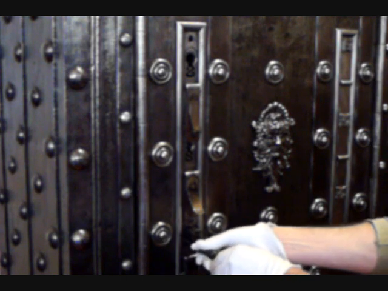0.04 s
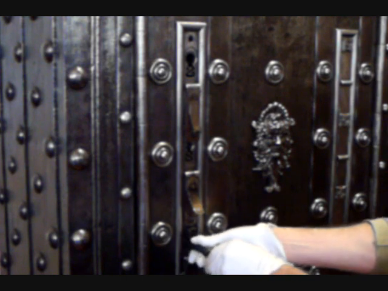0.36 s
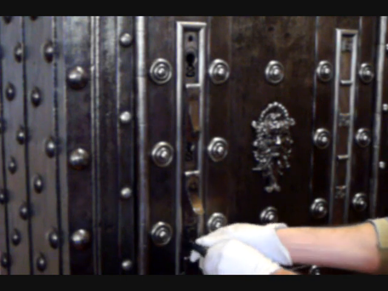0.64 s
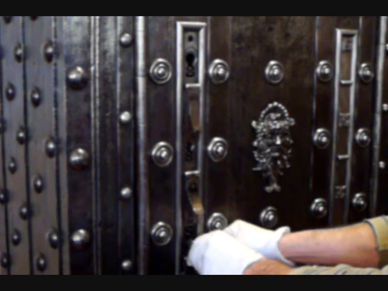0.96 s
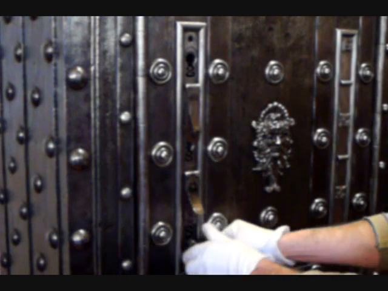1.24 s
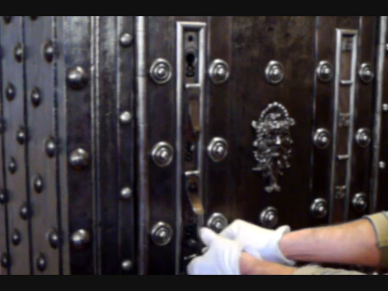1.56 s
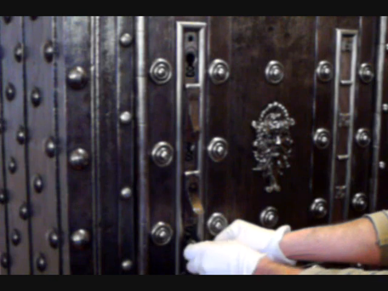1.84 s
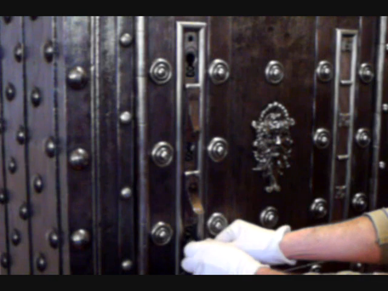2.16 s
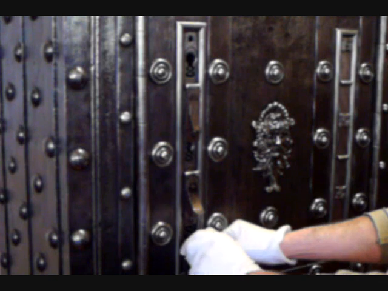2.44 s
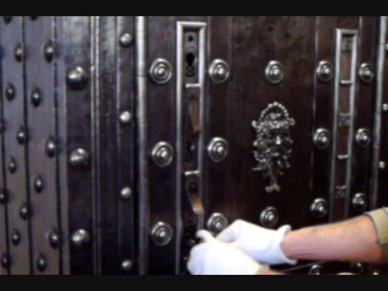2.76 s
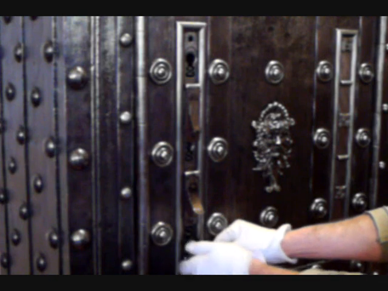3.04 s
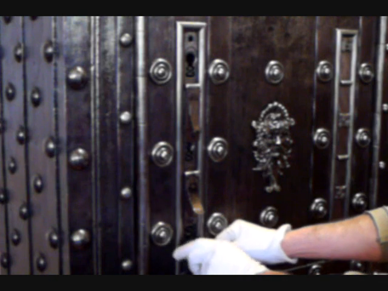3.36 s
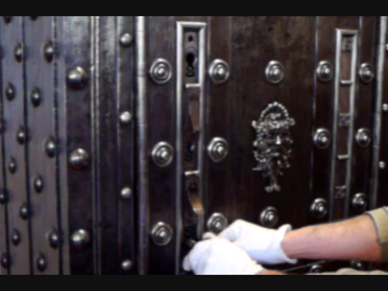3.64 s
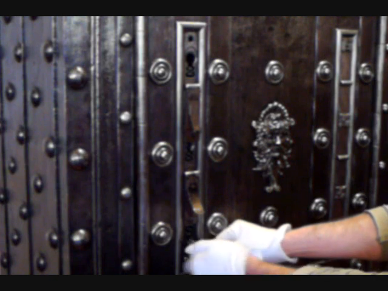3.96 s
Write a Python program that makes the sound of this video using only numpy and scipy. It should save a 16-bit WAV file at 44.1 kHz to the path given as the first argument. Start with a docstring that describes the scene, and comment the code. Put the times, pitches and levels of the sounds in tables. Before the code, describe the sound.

A key rattles in an old iron safe's lock, with a light knock at the start and short bursts of metallic knocks around 0.8, 1.8 and 2.4 seconds. The key gives two tiny high squeaks at about 3.2 and 3.4 seconds. Rattling builds from 3.6 seconds to a loud, slightly overloaded bolt clack near 3.9 seconds. Everything sounds dull, over steady hiss and low rumble in a quiet room.

```python
"""In a quiet, hissy room, gloved hands work a key in the lock of an old iron-clad safe.
Key and levers knock and rattle in short bursts; each touch rings the door, the lock case, its cover
plate and the small steel parts. The key squeaks on dry steel, faintly at 1.4 s and twice after 3 s.
Near 3.9 s the bolt shoots with a loud clack that overloads the dull-sounding recorder."""
import sys
import numpy as np
from scipy.fft import rfft, irfft, next_fast_len
from scipy.io import wavfile

SR = 44100
rng = np.random.default_rng(int(sys.argv[2]) if len(sys.argv) > 2 else 0)


def unload_wav(signal):
    """Save mono or channel-first audio to the path in sys.argv[1] as 16-bit WAV at rate SR, clipped to [-1, 1]."""
    wavfile.write(
        sys.argv[1],
        SR,
        np.round(np.clip(np.atleast_2d(signal).T, -1, 1) * 32767).astype(np.int16),
    )


N = 176400
T = np.arange(SR) / SR  # one second of time, the length of each single sound
HZ = np.fft.rfftfreq(SR, 1 / SR)
LOUDNESS_S = 0.021  # a contact's level is its energy spread over this time


def amp(db):
    """Turn decibels into a gain."""
    return 10 ** (np.asarray(db) / 20)


def unit(x):
    """Scale a signal to an average (rms) level of 1."""
    return x / np.sqrt(np.mean(x ** 2) + 1e-20)


def along(points, hz):
    """Read a curve of (frequency, value) points on a log frequency axis."""
    freqs, values = np.transpose(points)
    return np.interp(np.log(hz + 1), np.log(freqs + 1), values)


def filtered(x, response):
    """Give each frequency in x the gain that response(hz) sets."""
    size = next_fast_len(len(x) + 8192)
    return irfft(rfft(x, size) * response(np.fft.rfftfreq(size, 1 / SR)), size)[:len(x)]


def noise(spectrum, size):
    """Noise of level 1, shaped by a spectrum."""
    return unit(filtered(rng.standard_normal(size), lambda hz: amp(along(spectrum, hz))))


def add(track, start, sound):
    """Mix a sound into the track at a start time in seconds."""
    i = max(0, round(start * SR))
    track[i:i + len(sound)] += sound[:len(track) - i]


def room_tone(level_db=-41):
    """Steady low rumble and microphone hiss."""
    # spectrum of rumble and hiss: f/Hz, level/dB
    spectrum = [(12, -40), (20, -3), (26, -5.5), (64, -2.5), (135, -6), (215, -7), (284, -9), (557, -13),
                (656, -15), (930, -17), (1740, -19.5), (1870, -20), (5200, -21.5), (6760, -44),
                (11400, -120)]
    return amp(level_db) * noise(spectrum, N)


def door_sway(rise_s=.012, t60_s=.25):
    """The pushed door rocks on its hinges with a deep, soft rumble; t60 is the time to fade by 60 dB."""
    # pushes on the door: t/s, level/dB
    pushes = [(0.935, -28.5), (3.868, -25.5)]
    # spectrum of the rumble: f/Hz, level/dB
    spectrum = [(10, -32), (25, -14), (62, -9), (100, -16), (200, -34.5), (500, -79)]
    out = np.zeros(N)
    envelope = (1 - np.exp(-T / rise_s)) * amp(-60 * T / t60_s)
    for start, db in pushes:
        add(out, start, amp(db) * unit(envelope * noise(spectrum, SR)) * np.sqrt(2 * LOUDNESS_S))
    return out


def key_squeaks(pitch_hz=5210, width_hz=21, rise_s=0.002, t60_s=0.082, ring_t60_s=.45):
    """The key slips on dry steel: one high, slightly unsteady tone over a scrape; then it rings faintly."""
    # slips of the key: t/s, length/s, tone/dB, scrape/dB, ring/dB
    slips = [(1.384, 0.0087, -38, -48, -52), (3.180, 0.0083, -28, -42.5, -53),
             (3.401, 0.024, -36.5, -38, -35.5)]
    # spectrum of the scrape: f/Hz, level/dB
    spectrum = [(500, -44), (2300, -20), (2760, -4), (3050, -5), (3350, 7.5), (4300, 3), (5200, 11),
                (6000, -39)]
    # the key's own ringing tones: f/Hz, level/dB
    key_tones = [(2760, -9), (3340, -15), (3850, -11), (5230, -2.5)]
    out = np.zeros(N)
    onset = np.minimum(T / rise_s, 1)
    for start, length, tone_db, scrape_db, ring_db in slips:
        envelope = amp(-60 * np.maximum(T - length, 0) / t60_s)
        drift = np.cumsum(rng.standard_normal(SR)) * np.sqrt(2 * np.pi * width_hz / SR)
        tone = amp(tone_db) * np.sqrt(2) * np.sin(2 * np.pi * pitch_hz * T + drift)
        ringing = sum(amp(db) * np.sin(2 * np.pi * (hz * T + rng.random())) for hz, db in key_tones)
        ringing *= amp(ring_db - 60 * T / ring_t60_s)
        scrape = amp(scrape_db) * noise(spectrum, SR)
        add(out, start, onset * (ringing + envelope * (tone + scrape)))
    return out


def levers(pitch_spread=.06):
    """A lever snaps home with a short ping of five close tones."""
    # lever snaps: t/s, f/Hz, level/dB, t60/s
    snaps = [(0.055, 1104, -28, 0.078), (0.786, 1131, -12.5, 0.042), (0.908, 4950, -32, 0.033),
             (1.384, 4720, -35.5, 0.065), (1.385, 906, -38, .09), (1.7175, 4250, -31, .08),
             (1.7197, 2450, -39.5, 0.21), (1.720, 924, -21.5, 0.057), (1.722, 1820, -31, 0.1),
             (2.383, 4460, -33, .03), (2.437, 926, -16.5, 0.068), (3.743, 4950, -16.5, 0.016),
             (3.859, 2625, 0.5, 0.017)]
    out = np.zeros(N)
    for start, hz, db, t60 in snaps:
        offsets = np.linspace(-1, 1, 5) + rng.uniform(-0.075, 0.56, size=5)
        tones_hz = hz * (1 + pitch_spread * offsets)
        ping = np.sin(2 * np.pi * (tones_hz[:, None] * T + rng.random((5, 1)))).sum(axis=0)
        add(out, start, amp(db - 60 * T / t60) * unit(ping))
    return out


def part_response(tones, bed):
    """How a part answers a tap at each frequency: its strong tones over a bed of weaker ones."""
    peaks = sum(amp(db) ** 2 / (1 + (2 * (HZ - hz) / width) ** 2) ** 1.57 for hz, width, db in tones)
    power = amp(along(bed, HZ)) ** 2 + peaks
    # set the phases so that the part rings after the tap, never before it
    cepstrum = irfft(np.log(power) / 2)
    return np.exp(rfft(cepstrum * (1 + np.sign(T)) * (T < .5)))


def contact(response, rise_s, rattle_t60, room_db, room_t60, touch_db=-14, room_rise_s=0.0094):
    """One knock on one part: a sharp touch, a rattle and the room's echo, all coloured by the part."""
    rattle, echo = rng.standard_normal((2, SR))
    swell = 1 - np.exp(-(T / rise_s) ** 2)
    rattle = unit(rattle * swell * amp(-60 * T / rattle_t60))
    touch = amp(touch_db) * unit(1. * (T == T[round(rise_s * SR)]))
    echo = echo * swell * amp(-60 * T / room_t60) * (1 - np.exp(-T / room_rise_s))
    near = irfft(rfft(rattle + touch) * response)
    far = irfft(rfft(echo) * response)
    return unit(unit(near) + amp(room_db) * unit(far)) * np.sqrt(LOUDNESS_S)


def lock():
    """Key, levers and bolt strike inside the lock; each contact rings four parts of the safe."""
    # contacts: t/s, rise/s, door thump/dB, case knock/dB, plate clank/dB, steel click/dB
    contacts = [ (0.000, 0.0007, -37.5, -30, -35, -37), (0.053, .006, -37.5, -30, -35, -45),
                (0.783, .003, -41.5, -22.5, -24, -33), (0.809, 0.0037, -29, -27, -30, -46),
                (0.856, .001, -36, -22, -53, -37), (0.884, .006, -58, -25.5, -58, -38),
                (0.910, 0.0048, -29, -18.5, -27.5, -35), (0.934, 0.0051, -33, -24, -41, -34),
                (0.962, 0.0043, -23, -48, -36, -38.5), (0.984, 0.0026, -33, -31.5, -45, -55),
                (1.018, .004, -50, -57, -44, -64), (1.385, 0.0031, -57, -47, -50.5, -46.5),
                (1.7187, 0.00071, -70, -29.5, -31.5, -33), (1.835, 0.002, -31, -21, -29.5, -34.5),
                (1.848, 0.0028, -29.5, -22.5, -35, -38), (1.884, 0.008, -33, -24, -33, -36.5),
                (1.918, .004, -33, -48, -45, -52), (2.350, 0.01, -25, -26, -23, -34.5),
                (2.381, .002, -29, -17.5, -24, -27.5), (2.406, 0.0031, -33, -24.5, -42, -43),
                (2.435, 0.0012, -45, -20.5, -34.5, -44.5), (2.468, 0.0025, -31, -37, -37, -41),
                (3.503, .005, -44.5, -33.5, -37.5, -44), (3.615, 0.0057, -30, -33, -36.5, -43),
                (3.664, 0.0019, -31, -20.5, -32.5, -33.5), (3.688, 0.0027, -33, -24.5, -35, -45),
                (3.7403, 0.0015, -31, -26, -23.5, -25.5), (3.757, .009, -20, -14.5, -12.5, -18.5),
                (3.777, 0.0054, -23.5, -11.5, -17.5, -38), (3.815, 0.016, -21.5, -17.5, -25.5, -34.5),
                (3.8585, 0.00083, -17, -9, -9, -9), (3.864, .002, -14.5, -11, -11, -26.5),
                (3.905, 0.018, -38, -18, -24, -40), (3.950, 0.011, -29, -20, -32.5, -24.5)]
    # strong ringing tones of each part: f/Hz, width/Hz, level/dB
    door = [(75, 21, -4.5), (103, 19, -12), (141, 9.3, -3.5), (196, 26, -1)]
    case = [(192.4, 16, 0.5), (353, 30, -1.5), (394, 28, -2.5), (445, 22, -6.5), (553, 35, -3.5),
            (729.6, 28, -2.5), (816, 34, -1.5), (911.3, 38, -1.5), (950, 51, -11.5)]
    plate = [(1120, 59, 0), (1132, 85, -3), (1204, 54, -9), (1436, 98, -4.5), (1469, 69, -2.5),
             (1523, 12, -13.5), (1645, 96, -10), (1823, 25, -8)]
    steel = [(2240, 20, -17), (2174, 17, 8.5), (2320, 14, 2), (2455, 92, 0), (2630, 36, -7.5),
             (3260, 60, -32.5), (4044, 77, -7), (4950, 600, -12)]
    # the bed of weaker tones between them: f/Hz, level/dB
    door_bed = [(20, -30), (55, -1.5), (130, 16), (230, -6), (400, -25.5), (1000, -79)]
    case_bed = [(40, -34.5), (140, -10), (220, -5.5), (290, -12), (500, -10.5), (900, -10), (1100, -13.5),
                (1600, -26), (5000, -50)]
    plate_bed = [(200, -56.5), (700, -5.5), (1000, -10.5), (1320, -15), (1550, -15.5), (1900, -24),
                 (3000, -31), (5500, -33.5)]
    steel_bed = [(400, -39.5), (1500, -2.5), (2000, -2.5), (2700, -1.5), (3100, -2.5), (3650, -5.5),
                 (4400, -3), (5200, -8), (6000, -13)]
    parts = [(part_response(door, door_bed), dict(rattle_t60=.06, room_db=-5, room_t60=.42)),
             (part_response(case, case_bed), dict(rattle_t60=.075, room_db=-4, room_t60=.36)),
             (part_response(plate, plate_bed), dict(rattle_t60=.1, room_db=-5, room_t60=.42)),
             (part_response(steel, steel_bed), dict(rattle_t60=.092, room_db=-1.5, room_t60=.43))]
    out = np.zeros(N)
    for start, rise_s, *levels in contacts:
        for db, (response, decay) in zip(levels, parts):
            add(out, start, amp(db) * contact(response, rise_s, **decay))
    return out


def scene():
    """Lock, key, door and room at one microphone."""
    return (lock() + levers() + door_sway() + key_squeaks() + room_tone())[None]


def record(dry, input_limit=1.22, top_hz=16000):
    """The recorder squashes the loudest clack and cuts the treble; what overshoots clips with a crack."""
    # the recorder's steep treble cut: f/Hz, gain/dB
    treble_cut = [(5100, -1), (5320, -5), (5450, -10), (5580, -39), (5720, -78.5), (6000, -100)]
    squashed = dry[0] / (1 + np.abs(dry[0] / input_limit) ** 10) ** (1 / 10)
    dull = filtered(squashed, lambda hz: amp(along(treble_cut, hz)))
    clipped = np.clip(dull, -1, 1)
    return filtered(clipped, lambda hz: 1 / (1 + (hz / top_hz) ** 40))[None]


dry = scene()
out = record(dry)
unload_wav(out)
```